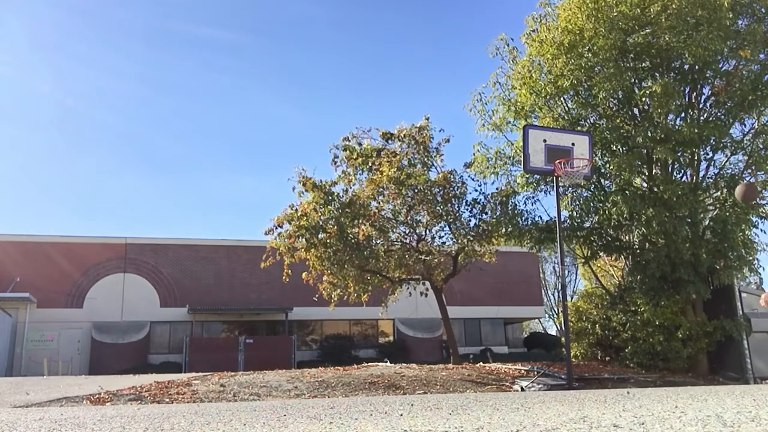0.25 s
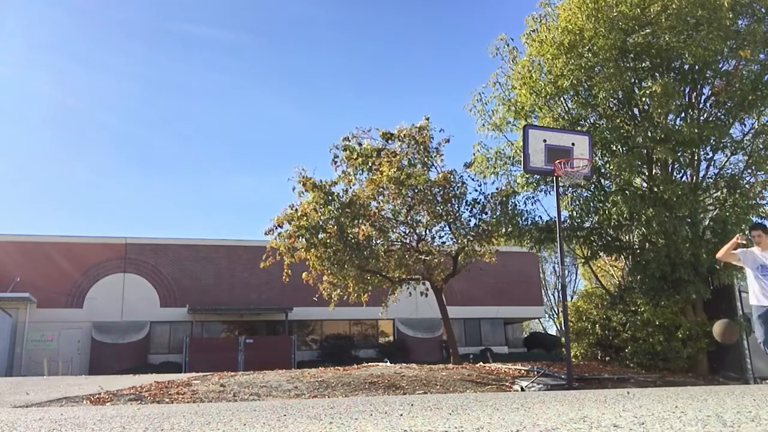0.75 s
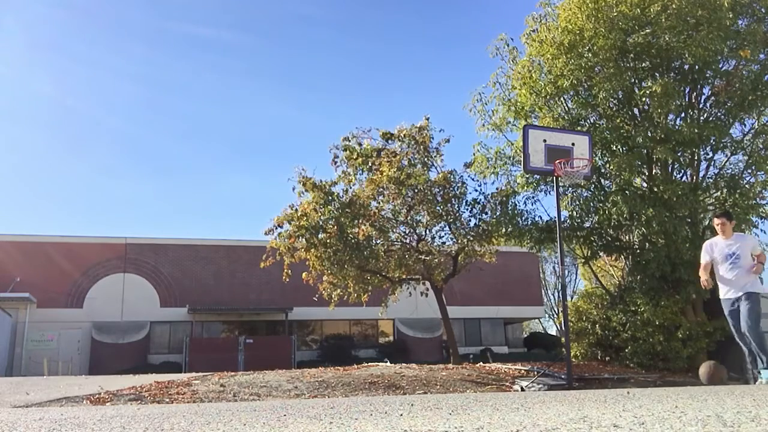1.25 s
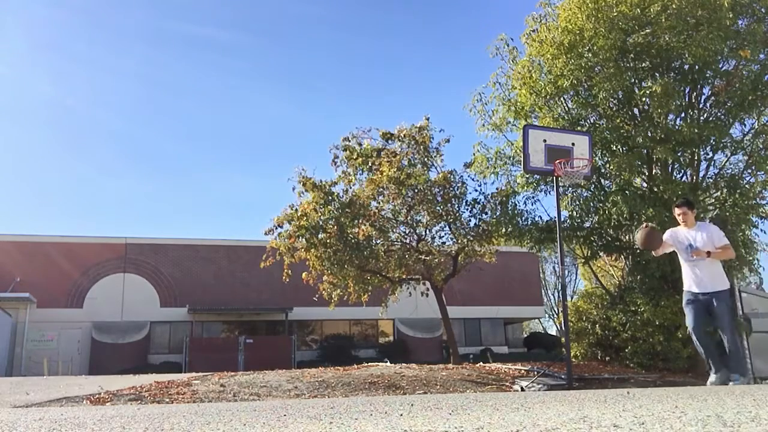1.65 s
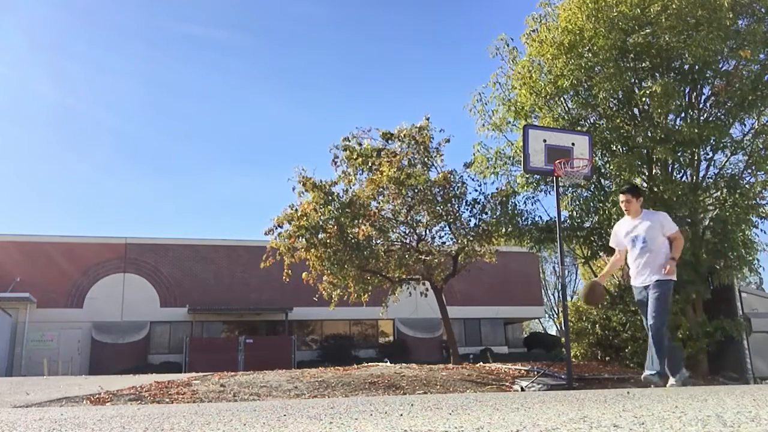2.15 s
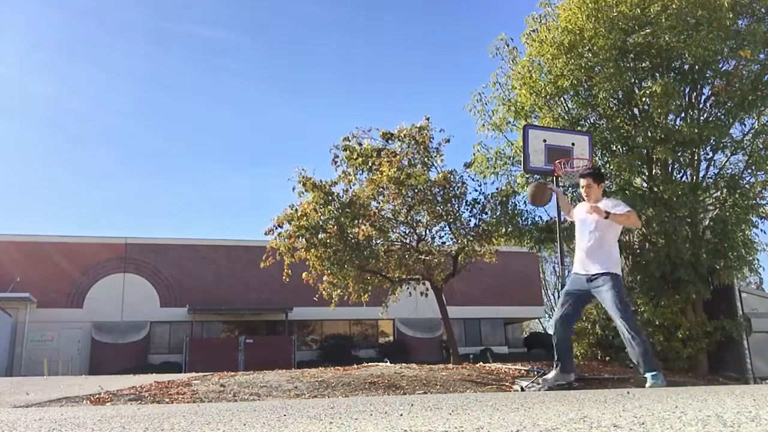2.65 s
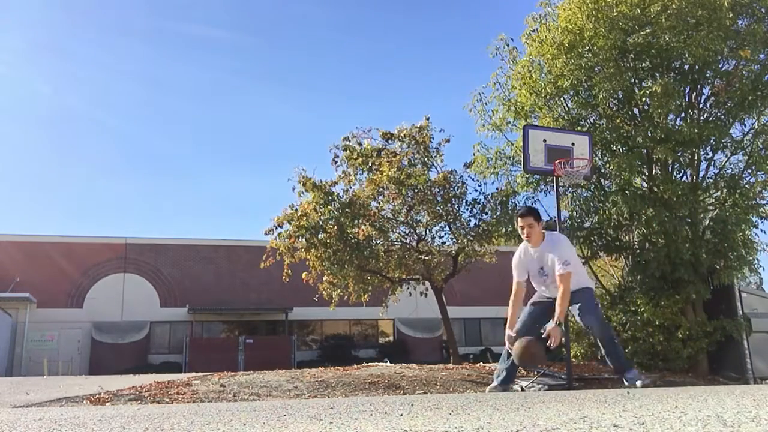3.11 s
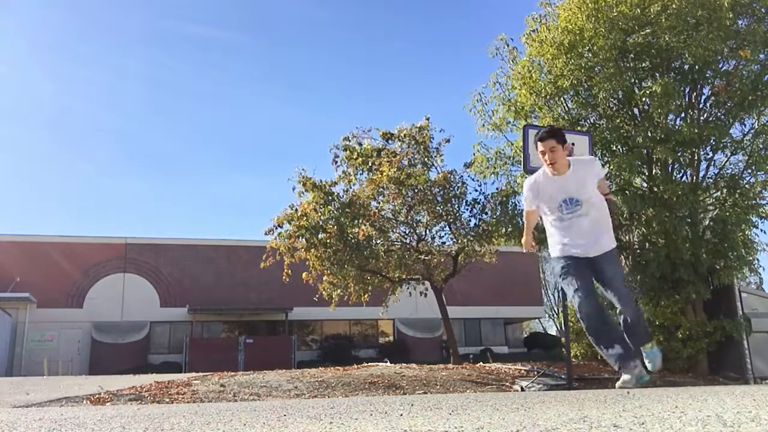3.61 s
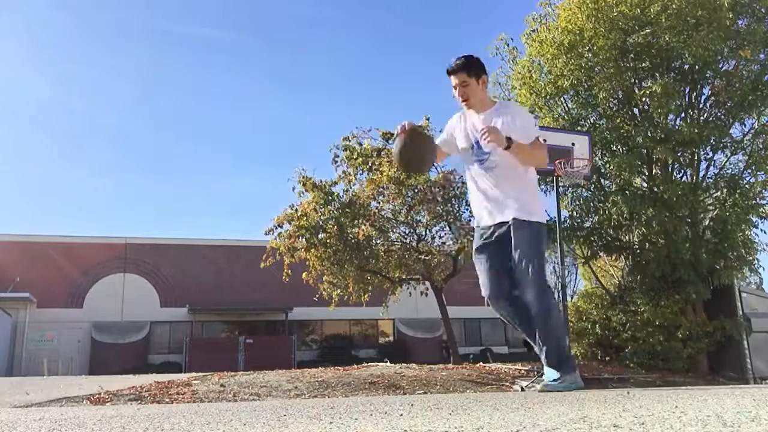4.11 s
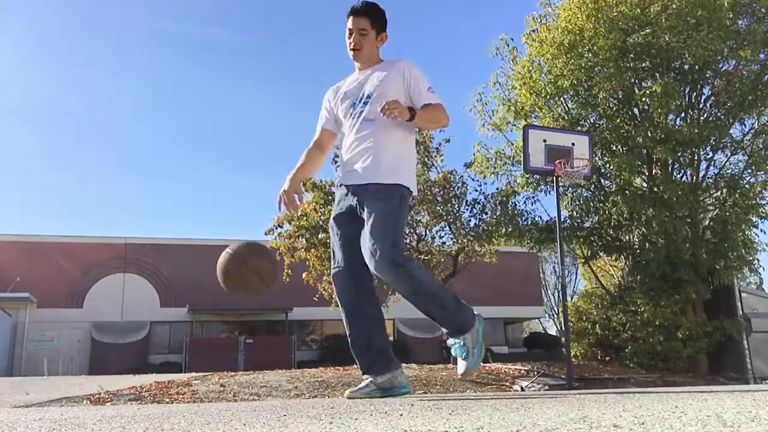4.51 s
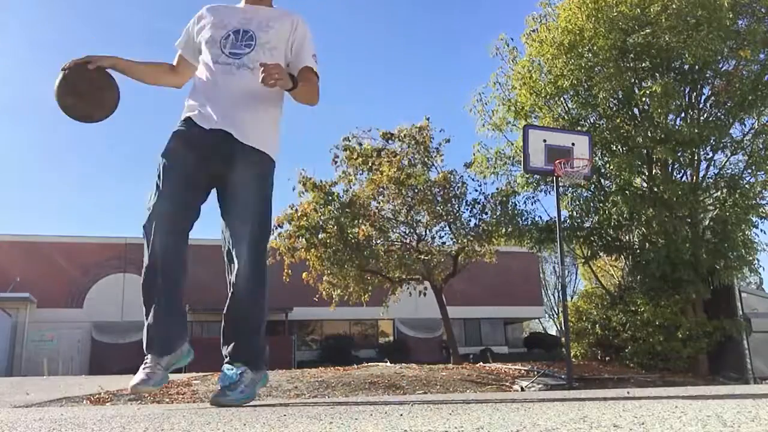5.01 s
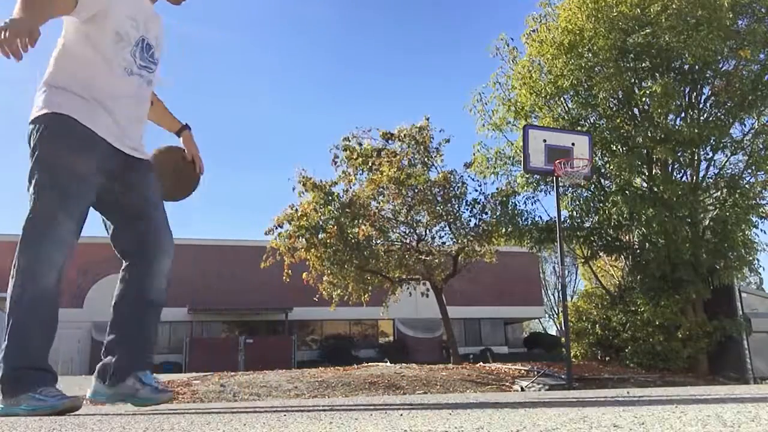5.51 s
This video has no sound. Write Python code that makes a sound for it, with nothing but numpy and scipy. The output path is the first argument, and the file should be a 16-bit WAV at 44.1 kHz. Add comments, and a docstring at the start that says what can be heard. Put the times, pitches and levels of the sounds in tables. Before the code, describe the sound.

Someone dribbles a basketball nearer across a paved lot, each bounce smacking with a slight ping and echo, shoes scraping between.

```python
"""An asphalt lot, where a basketball is dribbled towards a microphone near the ground.
Each bounce cracks, sends a bending wave round the shell, thumps and leaves the air inside pinging.
A near wall and a building throw the slap back. Shoes scuff on grit, heels knock, stones and fingers
tick, and denim swishes as the player closes in. Far traffic murmurs underneath."""
import sys
import numpy as np
from scipy import signal
from scipy.fft import rfft, irfft
from scipy.io import wavfile

SR = 44100
rng = np.random.default_rng(int(sys.argv[2]) if len(sys.argv) > 2 else 0)


def persist_wave(psi):
    """Save psi, clipped to +-1, as 16-bit WAV."""
    counts = np.round(np.clip(psi, -1, 1) * 32767).astype(np.int16)
    wavfile.write(sys.argv[1], SR, np.atleast_2d(counts).T)


N = 254016
SHOT = np.arange(int(.7 * SR)) / SR   # time axis of a one-shot, in seconds

# The dribble. Each row: start in seconds, slap, thump and shell flex levels in dB, slap resonance
# in Hz, treble tilt in dB per octave, air ping gain in dB, ping centre in Hz.
BOUNCES = [(0.8262, -21, -16, -10, 1020, -0.5, -41.5, 900), (1.2025, -19.5, -23, -10.5, 1170, 4, -47, 1300),
           (1.4102, -22, -14.5, -15.5, 1170, 0, -40.5, 1150),
           (2.1624, -18.5, -13.5, -11, 1210, 2, -38.5, 1050),
           (3.3276, -22, -21.5, -15, 1700, -3, -56, 1500), (3.9865, -16.5, -10, -9.5, 2090, 0, -40, 1650),
           (4.7312, -15, -5.5, -8.5, 1210, 3, -38, 2500), (5.418, -17, -9.5, -21.5, 2100, 4, -36.5, 2820)]


def ball():
    """Rubber slaps asphalt, the ball squashes, flexes and wobbles free, and the lot answers."""
    out = np.zeros(N)
    thump = swell(hz=98.4, start_s=0.005, length_s=0.0176)
    flex = swell(hz=199.2, start_s=0.00078, length_s=0.01077)
    wobble = late(np.sin(2 * np.pi * 62 * SHOT) * dying(0.21), 0.015)
    for s, slap_db, thump_db, flex_db, ring_hz, tilt_db, ping_db, ping_hz in BOUNCES:
        # a brighter bounce is a harder one: more flex laps the shell, more sand is crushed
        lap_db = flex_db - 1 + 1.9 * tilt_db
        sand_db = slap_db - 41.5 + 0.5 * tilt_db
        body_db = 0.36 * (flex_db - slap_db - 8.5)   # the low rattle follows the flex
        smack = from_db(slap_db) * slap(ring_hz, tilt_db, lap_db, body_db)
        hit = smack + from_db(thump_db) * thump + from_db(flex_db) * flex + from_db(-25) * wobble
        add(out, s, hit + from_db(sand_db) * crushed_sand() + from_db(ping_db) * air_ping(ping_hz))
        add_echoes(out, s, hit, smack)
    return out


# The rattle in the slap. Each row: frequency in Hz, relative density in dB, 60 dB decay in seconds.
SHELL_RATTLE = [(314, 4, 0.092), (484, 2.5, 0.095), (660, -4.5, 0.045), (940, 1, 0.036), (1310, 1.5, 0.036),
                (1970, -4.5, 0.011), (3400, -14.5, 0.016), (5080, -26.5, 0.022), (8000, -43.5, 0.0079),
                (15000, -57, 0.014)]


def shell_rattle(tilt_db, body_db):
    """The struck rubber rattles: half-octave noise bands, the lows hanging on longest."""
    rattle = 0
    edges_hz = 280 * 2 ** np.arange(0, 6.1, .5)
    for low, high in zip(edges_hz, edges_hz[1:]):
        hz = np.sqrt(low * high)
        db, t60 = at_hz(SHELL_RATTLE, hz)
        treble_octaves = np.clip(np.log2(hz / 1500), 0, 2)
        db = db + body_db * (hz < 560) + tilt_db * treble_octaves
        burst = unit_hit(band(noise_burst(t60), low, high, order=3))
        rattle = rattle + burst * np.sqrt(high - low) * from_db(db)
    return unit_hit(rattle)


def slap(ring_hz, tilt_db, lap_db, body_db, wave_hz=2600, wave_fall_s=0.003625, contact_s=0.016):
    """First contact cracks, the shell rattles and rings, and a bending wave arrives highs first."""
    crack = unit_hit(band(1. * (SHOT == 0), 1070, 3100 * from_db(0.5 * tilt_db), order=3))
    ring = unit_hit(np.sin(2 * np.pi * ring_hz * SHOT) * dying(0.016))
    wave_cycles = wave_hz * wave_fall_s * (1 - np.exp(-SHOT / wave_fall_s))
    wave = unit_hit(np.sin(2 * np.pi * wave_cycles) * dying(0.16))
    tones = band(from_db(-5) * ring + from_db(-8) * wave, 118, 3200)
    attack = from_db(-6) * crack + from_db(-0.5) * shell_rattle(tilt_db, body_db) + tones
    # the wave comes round the ball once more, duller; the shell falls still as it leaves the ground
    lap = from_db(lap_db) * late(band(attack, 540, 1680), 0.0096)
    choke = 1 / np.sqrt(1 + (SHOT / contact_s) ** 10)
    return unit_hit((attack + lap) * choke)


# The air inside the ball. Each row: mode in Hz, relative level in dB, 60 dB decay in seconds.
AIR_MODES = [(982, 1, 0.44), (1560, -7.5, 0.57), (2180, -5.5, 0.71), (2707, -3.5, 0.53), (2820, -8.5, 0.98),
             (3180, -10, 0.61), (3670, -17.5, 0.26), (3520, 0, 0.38), (3960, -13, 0.39),
             (4350, -11.5, 0.44), (5300, -7, 0.27), (5879, -36, .18)]


def air_ping(centre_hz, width_octaves=1.3, detune=0.00384, twin_db=-7):
    """The enclosed air rings; the side turned to the listener decides which modes stand out."""
    out = 0
    for hz, db, t60 in AIR_MODES:
        facing = 1 / np.sqrt(1 + (2 * np.log2(hz / centre_hz) / width_octaves) ** 2)
        # the ball is not quite round, so each mode beats against a twin
        twin_hz = hz * (1 + detune * rng.normal())
        twin = from_db(twin_db) * np.sin(2 * np.pi * (twin_hz * SHOT + rng.random()))
        out = out + facing * from_db(db) * (np.sin(2 * np.pi * hz * SHOT) + twin) * dying(t60)
    return out


def crushed_sand():
    """Sand cracks under the ball, a short fizz on top of the hit."""
    return unit_hit(band(noise_burst(t60=0.025), 3200, 10600, order=1))


def add_echoes(out, s, hit, smack, wall_m=12.5, building_m=32.8):
    """Mix in one bounce's reflections; wall and building stand behind the player."""
    # ground and trees scatter a thin tail
    add(out, s, from_db(-16) * echo(hit, 89, 9900, smear_t60=0.24, scatter_db=20))
    # the wall's slapback comes later and weaker as the player leaves it
    wall_s = echo_delay(s, wall_m)
    wall_gain = from_db(-12.5) * 0.019 / wall_s
    add(out, s + wall_s, wall_gain * echo(smack, 1540, 12000, smear_t60=0.12, scatter_db=8))
    # the building answers last, fainter while the player is far off under the trees
    far_echo = from_db(-18.5 - distance(s)) * echo(smack, 1000, 2500, smear_t60=0.23, scatter_db=0.5)
    add(out, s + echo_delay(s, building_m), far_echo)


def echo(x, low_hz, high_hz, smear_t60, scatter_db):
    """A band-limited reflection, smeared by the rough face that returns it."""
    scatter = noise_burst(smear_t60)
    response = (SHOT == 0) + from_db(scatter_db) * scatter / np.linalg.norm(scatter)
    smeared = signal.fftconvolve(x, response / np.linalg.norm(response))[:len(x)]
    return band(smeared, low_hz, high_hz)


def echo_delay(s, face_m, sound_m_per_s=343):
    """Round trip in seconds from the player to a surface face_m from the microphone."""
    return 2 * max(face_m - distance(s), 1) / sound_m_per_s


# The player's approach. Each row: time in seconds, distance in metres.
APPROACH = [(0, 8.9), (1.4, 7.8), (2.2, 5.8), (3.3, 5.3), (4.0, 2.7), (5.76, 2.34)]


def distance(s):
    """Metres from the player to the microphone at time s."""
    return np.maximum(np.interp(s, *np.transpose(APPROACH)), 1)


# The colours of a scuff: dull sole, mid scrape, bright grit.
# Each row: frequency in Hz, relative density in dB.
SOLE_SPECTRUM = [(150, 3), (420, 11), (650, 4), (1100, 1.5), (1800, -33)]
SCRAPE_SPECTRUM = [(700, 1), (1300, 5), (2300, 0), (3900, -5), (5000, -19.5), (7500, -50)]
GRIT_SPECTRUM = [(3000, 0), (5500, 4), (7000, -0.5), (8500, -8.5), (11000, -13.5), (16000, -19)]
# The footwork. Each row: start, attack and slide length in seconds, sole, scrape and grit levels in dB.
STEPS = [(0.152, 0.031, 0.039, -45, -45, -64), (0.654, 0.0045, 0.03, -44, -44.5, -59),
         (1.11, 0.006, 0.017, -46, -37, -51), (1.146, .004, 0.0085, -39.5, -46, -53.5),
         (1.2, .002, 0.032, -57, -49, -45.5), (1.338, .002, 0.026, -39, -40, -55),
         (1.916, 0.012, 0.04, -38.5, -40.5, -52), (2.289, 0.027, 0.051, -40, -32.5, -51),
         (2.767, 0.0072, 0.021, -39.5, -28.5, -46.5), (2.938, 0.028, 0.061, -46, -40.5, -54),
         (3.008, 0.012, 0.127, -47, -48.5, -55), (3.36, 0.023, .11, -68, -52, -59.5),
         (3.741, 0.0044, 0.037, -43, -45, -52), (4.118, 0.0054, 0.024, -30, -31.5, -42),
         (4.514, 0.0012, 0.035, -37.5, -39.5, -52), (4.861, 0.011, 0.056, -44, -46.5, -57),
         (5.223, 0.012, .02, -51, -48, -64)]


def footfalls(release_t60=0.051, toe_s=0.042, toe_db=-13.5):
    """Soles land and slide in fits, crushing loose grit: heel first, then a softer forefoot."""
    out = np.zeros(N)
    textures = [coloured(grains(per_s=9000, spread_db=2.8, clump_db=4), SOLE_SPECTRUM),
                coloured(grains(per_s=4000, spread_db=3.5, clump_db=4.5), SCRAPE_SPECTRUM),
                coloured(grains(per_s=1800, spread_db=3.1, clump_db=3), GRIT_SPECTRUM)]
    for layer, texture in enumerate(textures):
        pressure = np.zeros(N)
        for s, attack_s, slide_s, *levels_db in STEPS:
            release = from_db(-60 * np.maximum(SHOT - slide_s, 0) / release_t60)
            heel = np.minimum(SHOT / attack_s, 1) * release
            toe = from_db(toe_db) * late(heel, toe_s)
            add(pressure, s, from_db(levels_db[layer]) * np.maximum(heel, toe))
        out += texture * pressure
    slipping = from_db(1.5 * drift(per_s=70))
    return out * slipping


# Hard heel strikes. Each row: start in seconds, level of the knock in dB.
HEELS = [(2.770, -37.5), (3.745, -48.5), (4.122, -40), (4.5148, -28.5)]


def heels(knock_hz=630):
    """A hard heel rings one damped resonance, clicks and snaps the grit it lands on."""
    out = np.zeros(N)
    ring = np.sin(2 * np.pi * knock_hz * SHOT) * dying(0.013)
    knock = unit_hit(band(ring, knock_hz / 2, knock_hz * 2))
    click = unit_hit(band(1. * (SHOT == 0), knock_hz * 1.43, knock_hz * 2.05))
    for s, db in HEELS:
        add(out, s, from_db(db) * (knock + from_db(-7) * click + from_db(6) * tick()))
    return out


# The loudest dry ticks: stones underfoot and fingers tapping the ball.
# Each row: start in seconds, peak level in dB.
DRY_TICKS = [(.6603, -33), (0.7083, -30), (1.3418, -28), (1.9067, -29.5), (2.308, -23), (2.3218, -21),
             (2.5752, -32.5), (2.9584, -20.5), (2.9822, -29), (3.115, -23.5), (3.214, -35), (4.076, -26.5),
             (4.9221, -24.5), (5.0516, -32)]


def stones_and_fingers():
    """Stones and fingers tick sharply; small stones skitter at random, clearer as the player nears."""
    skitter = band(grains(per_s=8, spread_db=4.3, clump_db=6), 3000, 8600, order=1)
    out = from_db(-34) * skitter / distance(np.arange(N) / SR)
    for s, db in DRY_TICKS:
        add(out, s, from_db(db) * tick())
    return out


def tick():
    """One small, hard contact: a dry tick with peak 1."""
    burst = band(noise_burst(t60=0.0037), 1680, 3750)
    return burst / np.abs(burst).max()


# The rub of denim. Each row: frequency in Hz, relative density in dB.
DENIM_SPECTRUM = [(1000, -3), (3500, 2.5), (4800, -2.5), (6600, -6.5), (8000, -12), (10500, -16),
                  (16000, -22)]


def denim(swing_s=0.31, flutter_db=2.5, falloff=2.33):
    """Denim swishes as each footfall frees the other leg to swing; it only carries close up."""
    leg_speed = np.full(N, from_db(-6))   # the legs still rub between swings
    for s, *_ in STEPS:
        add(leg_speed, s + 0.027, np.sin(np.pi * np.clip(SHOT / swing_s, 0, 1)))
    gain = from_db(-44 + flutter_db * drift(per_s=30)) / distance(np.arange(N) / SR) ** falloff
    return leg_speed * gain * coloured(rng.standard_normal(N), DENIM_SPECTRUM)


# The traffic bed, low rumble and airy wash. Each row: frequency in Hz, relative density in dB.
RUMBLE_SPECTRUM = [(20, -27), (33, -3.5), (50, 1), (75, 1.5), (97, -5), (120, -4), (180, -10.5),
                   (205, -12.5), (290, -12.5), (325, -13.5), (358, -8), (410, -28), (800, -61.5)]
WASH_SPECTRUM = [(200, -13.5), (450, 1.5), (1100, 2), (2000, -0.5), (2400, -4), (3800, -11.5),
                 (4800, -20.5), (5400, -21), (7000, -26.5), (8000, -40), (10300, -41), (14500, -47),
                 (16000, -46)]


def traffic():
    """Distant roads blur into a rumble and a smooth wash, both wavering slightly."""
    rumble = from_db(-40.5 + 0.24 * drift(per_s=11)) * coloured(rng.standard_normal(N), RUMBLE_SPECTRUM)
    wash = from_db(-51 + drift(per_s=3.145)) * coloured(rng.standard_normal(N), WASH_SPECTRUM)
    return rumble + wash


def swell(hz, start_s, length_s):
    """A heavily damped mode that swells and dies while the ball is squeezed."""
    t = SHOT - start_s
    return np.sin(2 * np.pi * hz * t) * np.sin(np.pi * np.clip(t / length_s, 0, 1))


def grains(per_s, spread_db, clump_db):
    """Random clicks of very unequal size, louder in clumps."""
    sizes = from_db(spread_db * np.minimum(rng.exponential(1, N), 4))
    clicks = (rng.random(N) < per_s / SR) * rng.choice([-1, 1], N)
    return clicks * sizes * from_db(clump_db * drift(per_s=200))


def noise_burst(t60):
    """White noise with an instant attack and a decay."""
    return rng.standard_normal(len(SHOT)) * dying(t60)


def dying(t60):
    """Envelope that falls 60 dB in t60 seconds."""
    return from_db(-60 * np.minimum(SHOT / t60, 5))


def drift(per_s):
    """A modulator that glides between random values of spread 1."""
    knots = rng.standard_normal(2000)
    return np.interp(np.arange(N) / SR * per_s, np.arange(len(knots)), knots)


def band(x, low_hz, high_hz, order=2):
    """Causal band-pass."""
    edges_hz = [low_hz, min(high_hz, SR / 2 - 500)]
    return signal.sosfilt(signal.butter(order, edges_hz, "band", fs=SR, output="sos"), x + 1e-18)


def coloured(x, spectrum):
    """EQ a steady signal with a spectrum and scale it to rms 1."""
    curve_db = at_hz(spectrum, np.arange(N // 2 + 1) * SR / N)[0]
    shaped = irfft(rfft(x) * from_db(curve_db), N)
    return shaped / np.sqrt(np.mean(shaped ** 2) + 1e-20)


def at_hz(spectrum, hz):
    """Read every column of a spectrum on a log-frequency axis."""
    known_hz, *columns = np.transpose(spectrum)
    return [np.interp(np.log(hz + 1e-9), np.log(known_hz), column) for column in columns]


def unit_hit(x):
    """Scale a short burst to the energy of 25 ms at rms 1."""
    return x / np.sqrt(np.sum(x ** 2) / (.025 * SR) + 1e-20)


def from_db(db):
    """Decibels to gain."""
    return 10 ** (np.asarray(db) / 20)


def late(x, s):
    """Delay by s seconds."""
    return np.pad(x, (max(round(s * SR), 0), 0))[:len(x)]


def add(out, s, x):
    """Mix x in at s seconds."""
    i = max(round(s * SR), 0)
    out[i:i + len(x)] += x[:N - i]


def scene():
    """Ball, player and traffic in a mono mix."""
    return (ball() + footfalls() + heels() + stones_and_fingers() + denim() + traffic())[None]


def record(dry):
    """The microphone sheds the deepest bass, clips at full scale and cuts the top."""
    low_cut = signal.butter(2, 27, "high", fs=SR, output="sos")
    high_cut = signal.ellip(10, .1, 80, 16000, fs=SR, output="sos")
    clipped = np.clip(signal.sosfilt(low_cut, dry), -1, 1)
    return signal.sosfilt(high_cut, clipped)


dry = scene()
out = record(dry)
persist_wave(out)
```